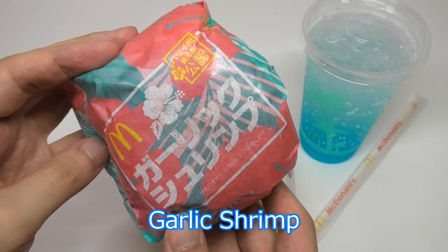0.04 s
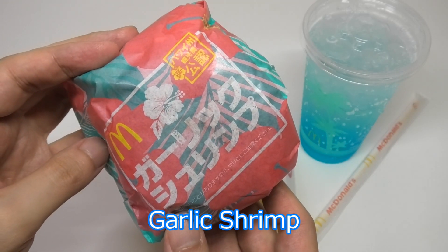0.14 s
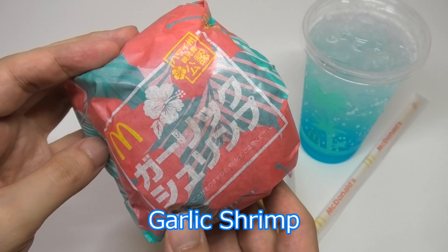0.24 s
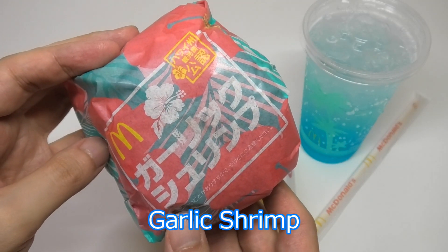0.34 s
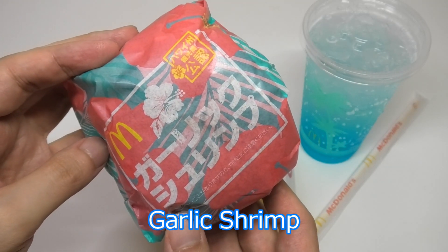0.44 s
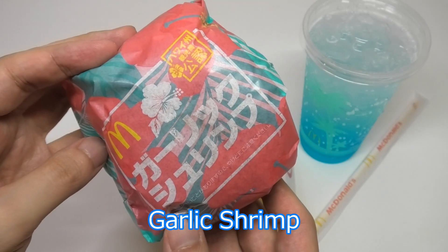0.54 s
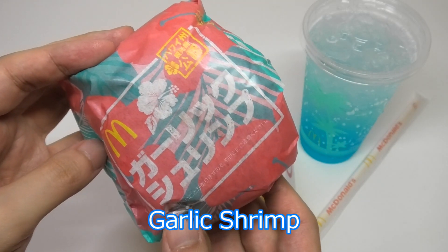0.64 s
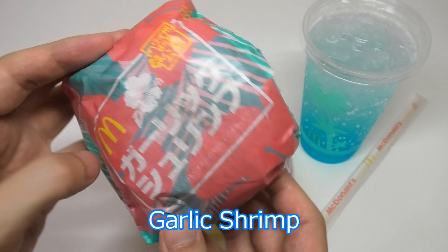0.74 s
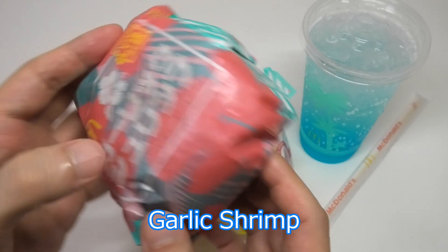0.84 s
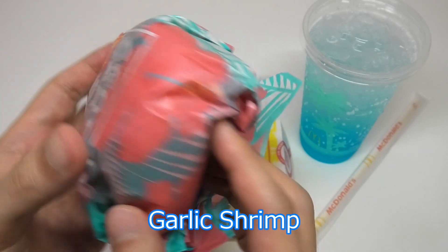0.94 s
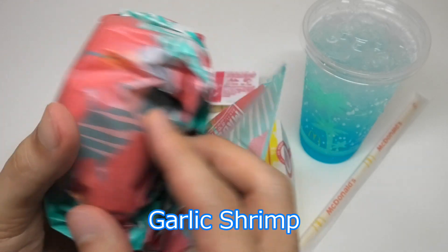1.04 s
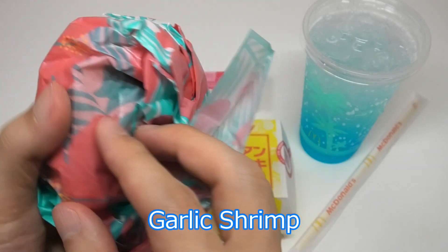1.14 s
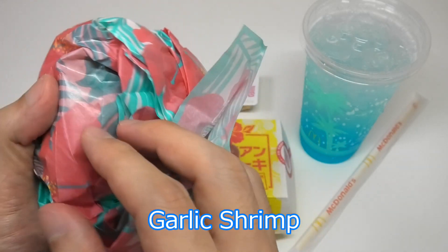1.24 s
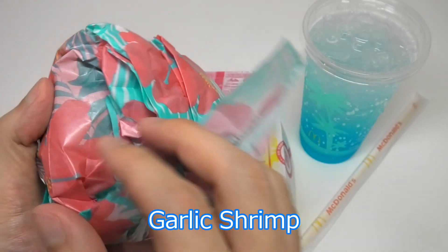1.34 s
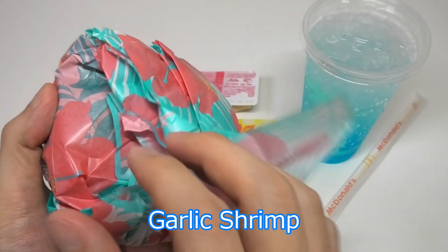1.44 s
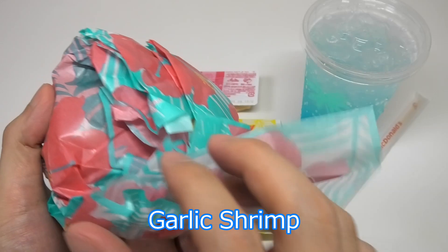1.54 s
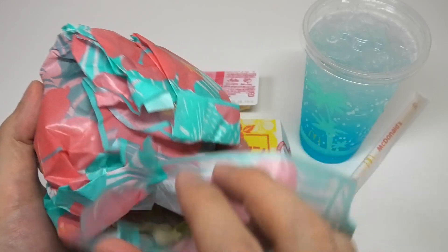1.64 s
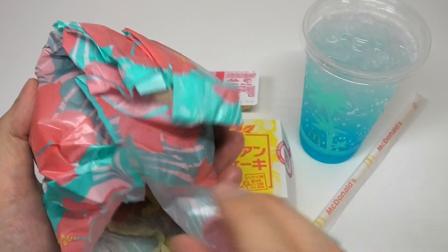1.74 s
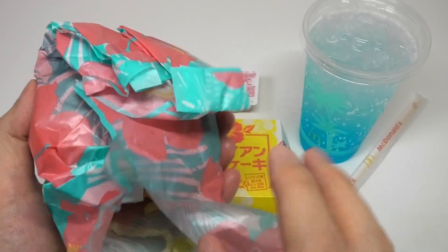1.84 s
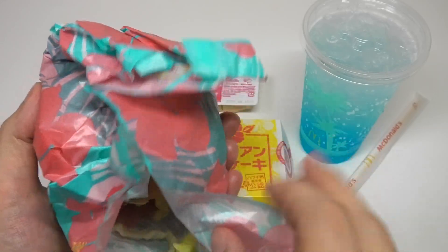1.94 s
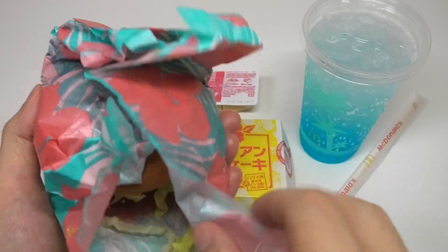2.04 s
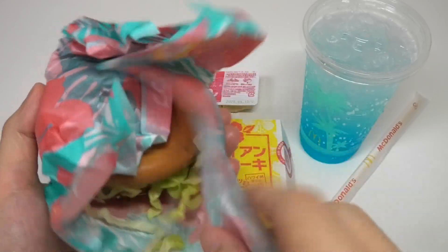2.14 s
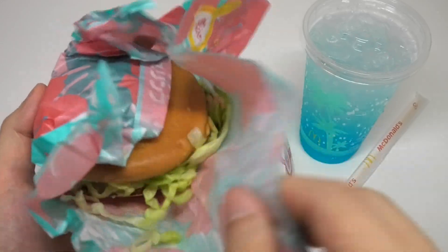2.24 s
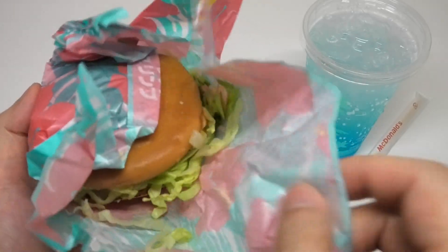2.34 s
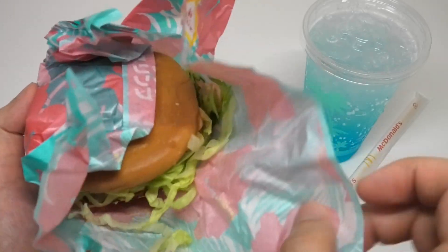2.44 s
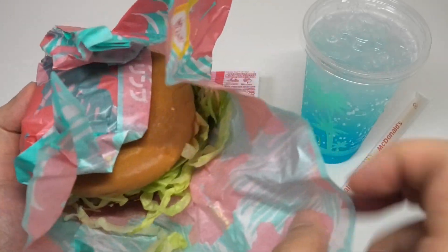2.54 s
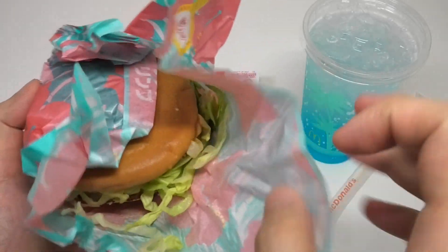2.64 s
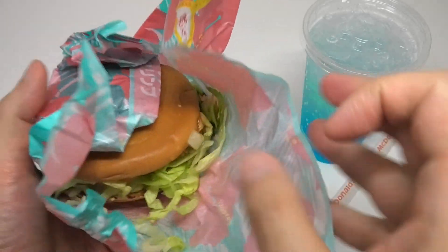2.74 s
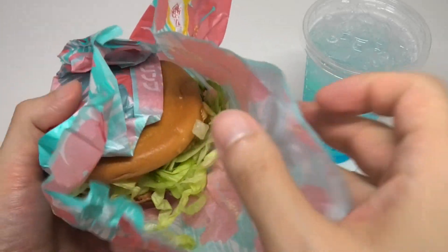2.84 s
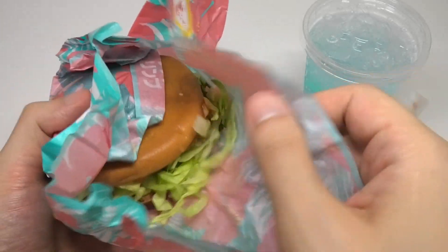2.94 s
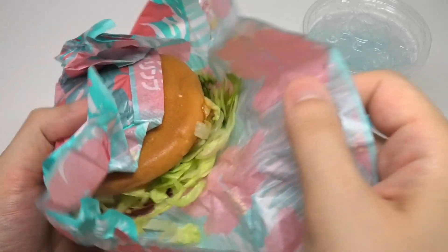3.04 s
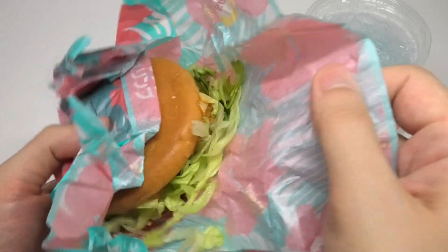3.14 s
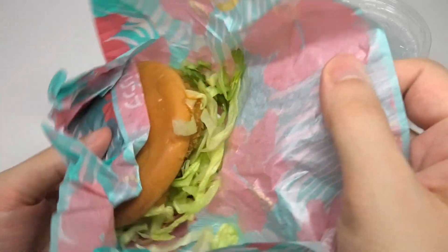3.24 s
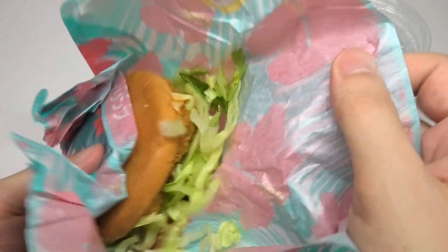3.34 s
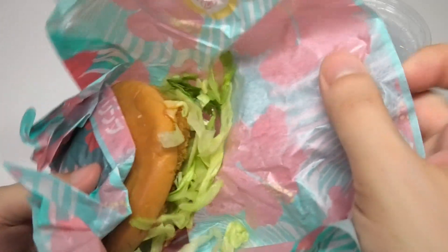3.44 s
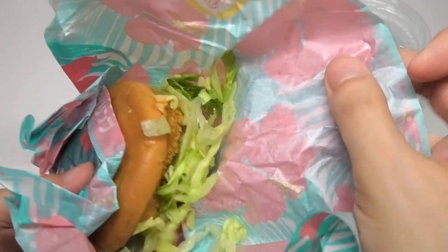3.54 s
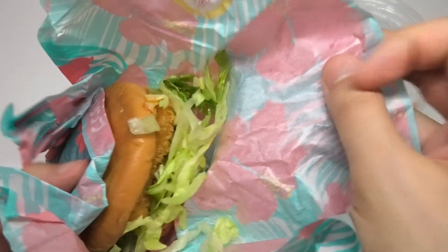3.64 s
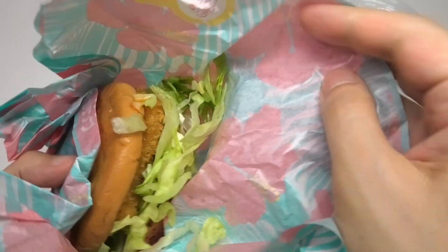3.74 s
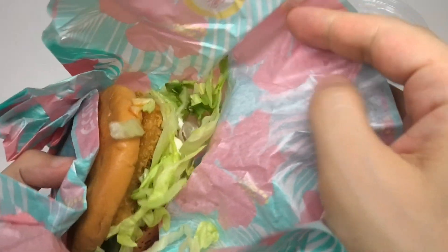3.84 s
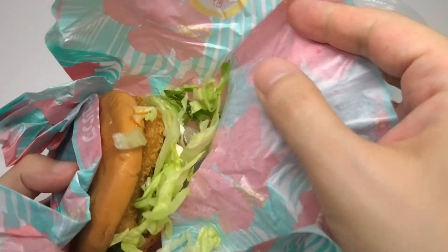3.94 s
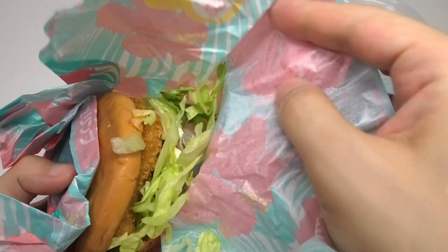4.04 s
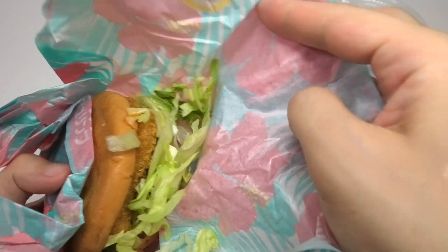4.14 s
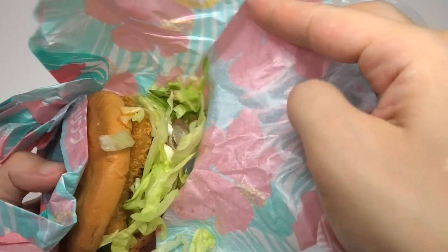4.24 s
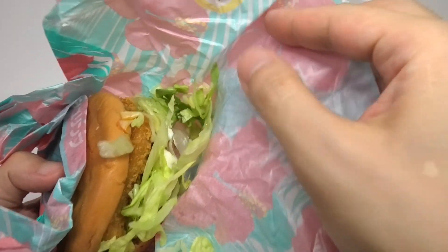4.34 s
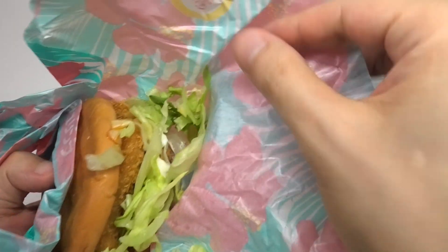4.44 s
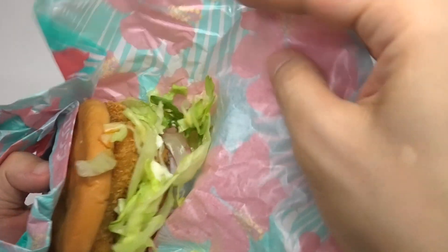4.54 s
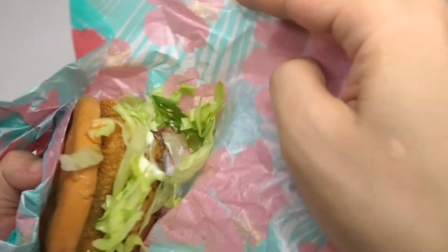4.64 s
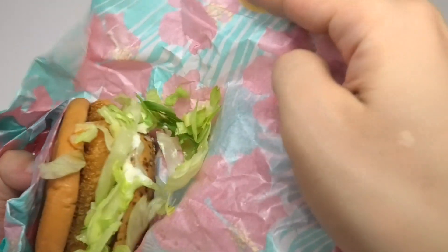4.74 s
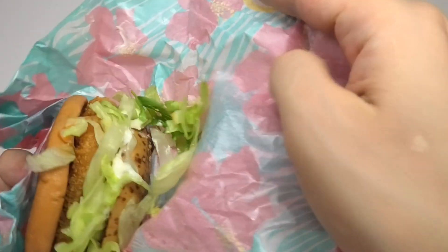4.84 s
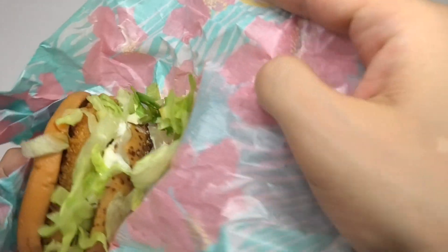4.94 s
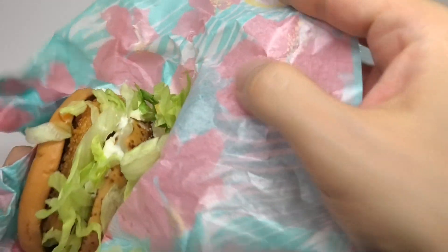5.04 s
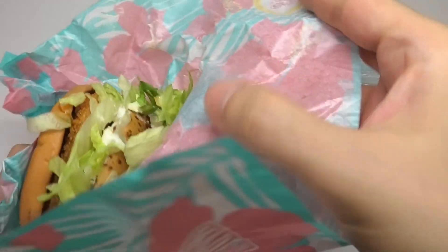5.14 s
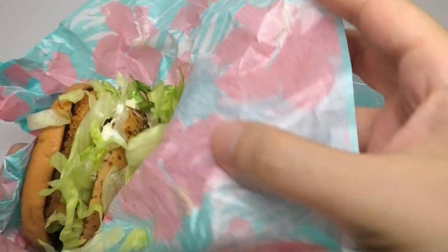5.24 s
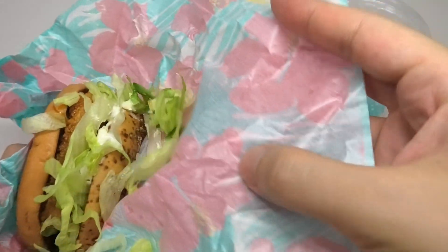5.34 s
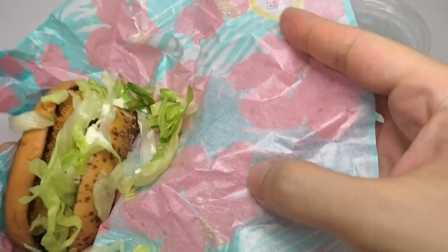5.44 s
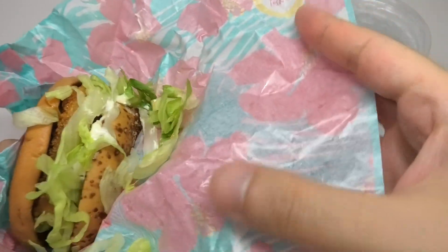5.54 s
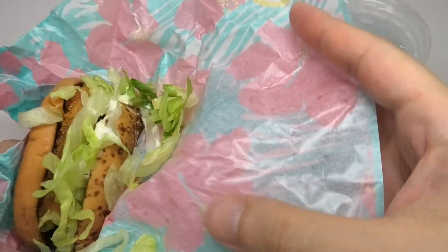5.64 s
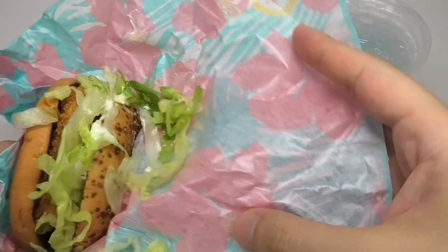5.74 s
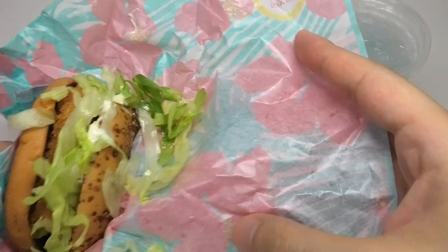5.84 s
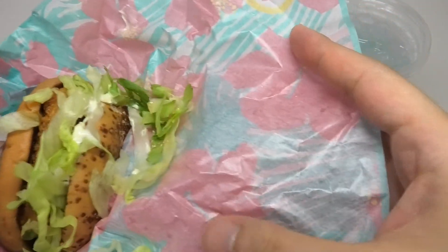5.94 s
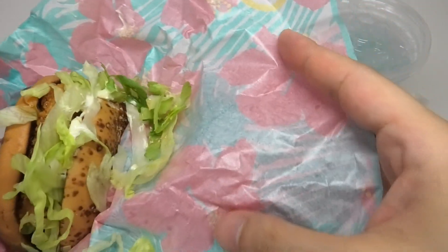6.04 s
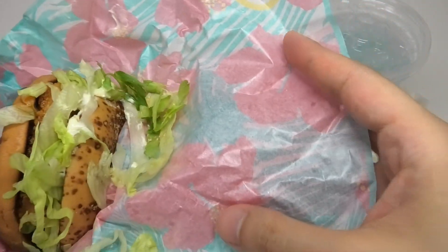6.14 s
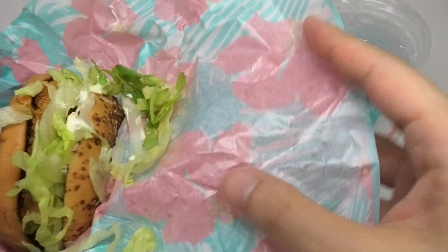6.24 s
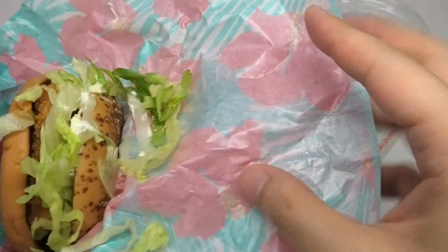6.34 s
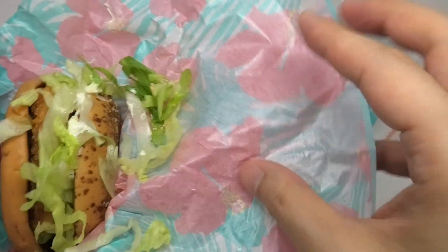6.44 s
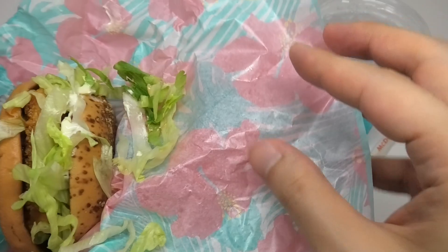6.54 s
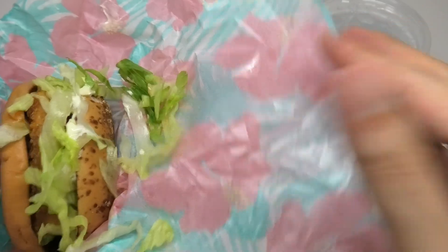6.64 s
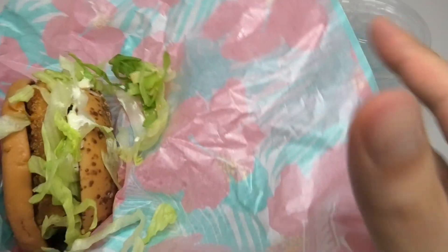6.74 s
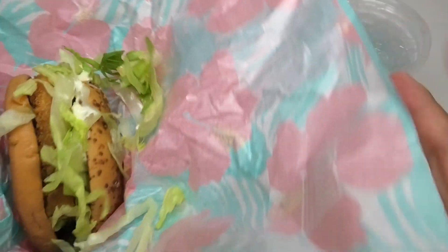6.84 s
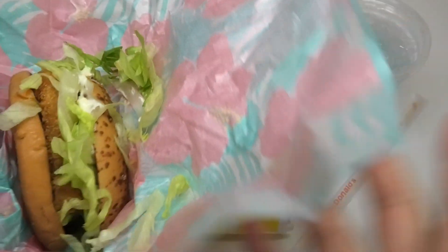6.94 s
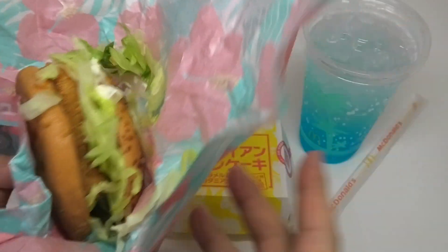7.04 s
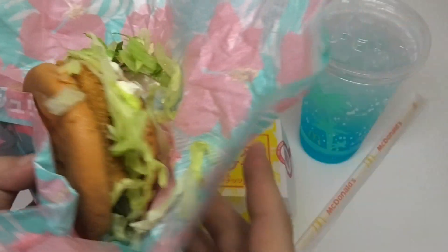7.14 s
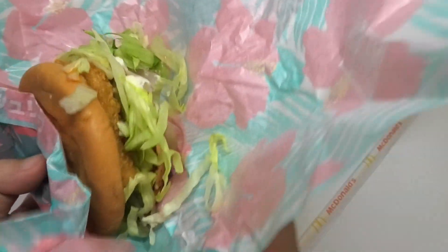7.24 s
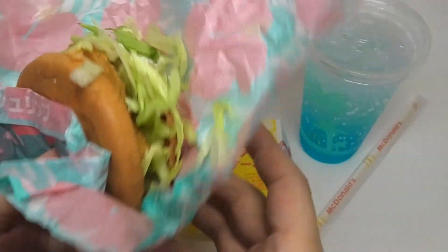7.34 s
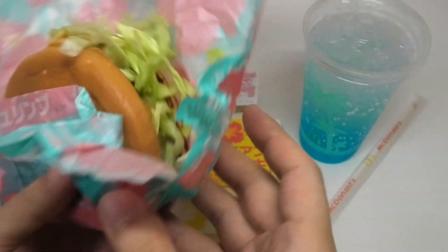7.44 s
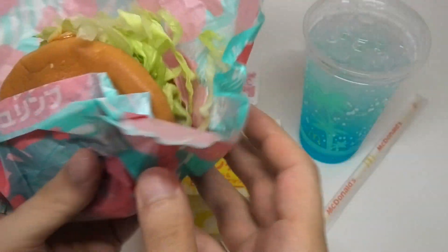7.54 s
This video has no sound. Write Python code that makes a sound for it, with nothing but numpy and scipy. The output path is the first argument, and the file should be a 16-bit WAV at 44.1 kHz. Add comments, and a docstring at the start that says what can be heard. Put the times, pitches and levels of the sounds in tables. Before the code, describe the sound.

A few light snaps, then continuous crisp crackling and rustling as a paper burger wrapper is unfolded by hand.

```python
"""A few light snaps, then a crisp crackle: hands unfold the thin waxed paper around a burger, close by.
With each pull swarms of tiny facets buckle, each releasing its elastic energy as a click, and the
layers slide on each other with a hiss of friction. Creases snap over one by one, and now and then a
wide panel pops through with a hollow knock. The small, quiet room adds a short reverberation."""
import sys
import numpy as np
from scipy import signal
from scipy.fft import rfft, irfft, next_fast_len
from scipy.io import wavfile
from scipy.ndimage import map_coordinates

SR = 44100
rng = np.random.default_rng(int(sys.argv[2]) if len(sys.argv) > 2 else 0)


def output_pcm(signal):
    """Save a mono or channel-first signal as 16-bit PCM at the path in sys.argv[1].

    Samples are clipped to [-1, 1] before scaling.
    """
    pcm = np.clip(np.atleast_2d(signal).T, -1, 1) * 32767
    wavfile.write(sys.argv[1], SR, np.round(pcm).astype(np.int16))


N = 335160

# the tugs that open the sheet: (start [s], length [s], effort [dB], facet pitch [Hz])
PULLS = [(0.742, .015, -44, 2630), (0.86, .19, -39.5, 3670), (1.09, .15, -37, 2500), (1.45, .03, -41, 2580),
         (1.65, .12, -35.5, 3040), (1.79, .23, -36.5, 2930), (2.108, .065, -33.5, 4230),
         (2.205, .08, -32.5, 3500), (2.34, .11, -36, 2650), (2.6, .07, -39, 4000), (2.78, .16, -41.5, 2580),
         (2.97, .07, -33.5, 2690), (3.06, .07, -30.5, 2800), (3.15, .11, -35, 2950),
         (3.35, .15, -34.5, 2660), (3.54, .06, -38, 2100), (3.65, .16, -35.5, 2600), (3.87, .09, -32, 3300),
         (4.03, .04, -31.5, 3500), (4.16, .07, -33.5, 2700), (4.305, .045, -33.5, 4380),
         (4.517, .05, -28.5, 2850), (4.63, .075, -31.5, 3130), (4.72, .11, -35, 2760),
         (5.0, .15, -37, 3230), (5.345, .05, -34.5, 3150), (5.44, .1, -35, 2950), (5.73, .06, -35.5, 3230),
         (5.885, .035, -42, 2800), (6.02, .05, -40, 2520), (6.24, .04, -44, 2640), (6.375, .08, -36, 3060),
         (6.51, .04, -43, 2400), (6.68, .09, -43, 2700), (6.89, .07, -41, 3030), (7.02, .06, -43.5, 3300),
         (7.16, .07, -41.5, 3560), (7.395, .2, -38.5, 4080)]
# sliding of layer on layer, relative to the effort: (time [s], level [dB])
SLIP = [(0.65, -3.5), (0.9, -3.5), (1.35, -3.5), (1.6, -2.5), (2.2, -3), (2.7, -1.5), (3.1, -5), (6.1, -3),
        (6.8, -4.5), (7.2, -7)]


def crinkle(level_db=-1.5, rate=540, size_db=7.5, clump_db=3.5, pitch_spread=0.99, relief=0.43):
    """Elastic buckling: tiny facets give way in clumps; harder bending trips more of them, and louder."""
    touch_s, share_s, lowest_hz = 0.55, 0.052, 720
    t = np.arange(N) / SR
    flex = amp(effort_db(t))
    density = flex ** .8 * (t > touch_s)
    chance = rng.random(int(rate * N / SR))
    s = np.interp(chance, np.cumsum(density) / density.sum(), t)
    size, pitch = rng.standard_normal((2, len(s)))
    at = (s * SR).astype(int)
    gains = amp(size_db * np.minimum(size, 1.8) + clump_db * wobble(80)[at])
    # the facets of one moment share the energy that the hands put in
    window = np.hanning(int(share_s * SR) * 2) / (share_s * SR)
    spent = signal.oaconvolve(np.bincount(at, gains ** 2, N), window, "same")
    gains *= amp(level_db) * flex[at] / np.sqrt(abs(spent[at]))
    # sliding layers relieve the strain, so the facets buckle more softly
    slip_db = curve(SLIP, s)
    gains *= amp(-relief * (slip_db - slip_db.mean()))
    hz = lowest_hz + abs(facet_hz(s) - lowest_hz) * np.exp(pitch_spread * pitch)
    return buckles(s, gains, np.minimum(hz, 14000), ring_db=5, ring_t60=.016, q=.9, mode_db=9.5)


def creases(level_db=-1, run_db=-9, run_s=.0006, follow_db=-15, follow_s=.005, count=2):
    """Snap-through instability: a crease flips in a few jerks, then trips smaller neighbours."""
    # the creases that stand out: (time [s], relative energy [dB], pitch [Hz])
    main_creases = [(0.6257, -22.5, 3140), (0.7345, -12, 2390), (0.7434, -17, 1207), (0.765, -18.5, 3600),
                    (0.832, -16, 3520), (0.916, -22, 5500), (1.1195, -7, 1670), (1.1391, -18, 12000),
                    (1.39, -15, 3000), (1.4588, -16, 3680), (1.5207, -7.5, 4040), (1.5649, -8.5, 2960),
                    (1.7386, -6, 6900), (1.7971, -5.5, 2050), (1.837, -3.5, 3700), (1.9178, -7.5, 4870),
                    (2.074, -8.5, 4300), (2.2099, -4, 5800), (2.2568, -9, 2540), (2.4193, -2.5, 3680),
                    (2.4766, -1.5, 6400), (2.5466, -12, 1430), (2.5697, -5, 5170), (2.6392, -6.5, 2100),
                    (2.6761, -7.5, 4560), (2.7284, -10, 4700), (2.7756, -9, 2470), (2.9687, -4.5, 3230),
                    (3.1084, -3.5, 2080), (3.1444, 4, 3880), (3.2064, -17, 2400), (3.2318, -5, 4530),
                    (3.3538, -8, 2400), (3.4416, -1.5, 3600), (3.4905, -2.5, 3200), (3.6623, -21, 5100),
                    (3.7414, -2, 4070), (3.7919, -1, 2540), (3.8322, -3.5, 4020), (3.9433, -0.5, 3960),
                    (4.0254, -4, 3900), (4.0561, 2, 3500), (4.1891, 0, 9700), (4.2676, -4.5, 2780),
                    (4.3513, -8, 6700), (4.4475, 0.5, 4900), (4.482, -10.5, 7850), (4.5184, 1.5, 4400),
                    (4.5435, -1.5, 4900), (4.6375, 0, 3720), (4.6884, -0.5, 2800), (4.7922, -2, 5460),
                    (4.8449, -4, 4200), (4.8631, -11, 6300), (4.9535, -9.5, 3340), (4.9839, -3.5, 3500),
                    (5.0013, -4.5, 4270), (5.045, -2, 2620), (5.3445, -1.5, 2360), (5.3588, 0, 4030),
                    (5.3646, -2.5, 3320), (5.3728, -3, 2820), (5.44, -2.5, 2100), (5.4995, -1.5, 5500),
                    (5.7105, -5.5, 4380), (5.7262, 2, 6600), (5.7379, 1.5, 5470), (5.7826, -5.5, 5900),
                    (5.846, -16, 2030), (5.879, -5.5, 4000), (6.0197, -7.5, 3470), (6.0268, -7.5, 4400),
                    (6.0424, -6, 5000), (6.076, -22, 5960), (6.1604, -12, 2230), (6.2398, -13, 3240),
                    (6.3429, -3.5, 2780), (6.3803, -5, 4900), (6.4213, -2, 3000), (6.5194, -11, 1530),
                    (6.7041, -10.5, 980), (6.816, -14, 1430), (6.904, -12, 5500), (7.009, -19, 3000),
                    (7.049, -17.5, 6000), (7.1582, -9.5, 1590), (7.1781, -15, 3520), (7.2218, -8, 7440),
                    (7.307, -13, 2250), (7.3553, -13, 4500), (7.4228, -12, 1900), (7.4516, -7, 2290),
                    (7.538, -4, 5340)]
    s, db, hz = np.vstack([main_creases, lesser_creases()]).T
    snap = buckles(s, amp(db + level_db), hz, ring_db=2.5, ring_t60=.013, q=.85, mode_db=-3)
    jerk, wait, size, pitch = rng.standard_normal((len(s) * count, 4)).T
    s, db, hz = np.repeat([s, db, hz], count, axis=1)
    run = buckles(s + run_s * jerk, amp(db + run_db), hz * np.exp(.3 * pitch),
                  ring_db=-1.5, ring_t60=.014, q=.48, mode_db=-3)
    neighbours = buckles(s + follow_s * abs(wait), amp(db + follow_db + 4.7 * size),
                         hz * np.exp(-.5 * abs(pitch)), ring_db=0, ring_t60=.012, q=.93, mode_db=5)
    return snap + run + neighbours


def lesser_creases(rate=8, above_db=24, range_db=6, pitch_hz=3600, pitch_range=1.27):
    """Small creases yield at random under load: (time [s], relative energy [dB], pitch [Hz])."""
    moment, size, pitch = rng.random((int(rate * N / SR), 3)).T
    progress = (np.arange(len(moment)) + moment) / len(moment)
    s = np.interp(progress, [0, 1], [PULLS[0][0], N / SR])
    db = effort_db(s) + above_db + range_db * (size - .5)
    hz = pitch_hz * np.exp(pitch_range * (pitch - .5))
    return np.transpose([s, db, hz])


def ticks(above_db=15, rate=26, size_db=5, pitch_hz=9500):
    """Random impulses: sharp corners of the folds flick, thin and bright, even under a light hand."""
    moment, size, pitch = rng.random((int(rate * N / SR), 3)).T
    s = np.interp(moment, [0, 1], [PULLS[0][0], N / SR])
    db = effort_db(s) + above_db + size_db * np.minimum(-np.log(size), 2)
    return buckles(s, amp(db), pitch_hz * np.exp(pitch - .5), ring_db=-5, ring_t60=.0087, q=1, mode_db=2)


def buckles(times, gains, pitch_hz, ring_db, ring_t60, q, mode_db, mode_q=15, mode_spread=0.3125):
    """Impulse excitation: each buckle is a sharp push and a short shiver through a facet's resonances."""
    size, lead_in = 512, 8  # samples
    lag_spread_s, pan_db = 14e-6, 2
    t, hz = np.arange(size) / SR, np.fft.rfftfreq(size, 1 / SR) + 1
    draws = rng.standard_normal((len(times), size + 4))
    sign, place, pan, shape = draws[:, :4].T[:, :, None]
    shiver = draws[:, 4:] * amp(-60 * t / ring_t60)
    push = amp(ring_db) * shiver / np.linalg.norm(shiver, axis=1, keepdims=True)
    push[:, :1] = np.sign(sign)
    # a broad hump set by the facet's size, and one narrow mode set by its shape
    ratio = hz / pitch_hz[:, None]
    facet = resonance(ratio, q) + amp(mode_db) * resonance(ratio * np.exp(mode_spread * shape), mode_q)
    spectra = rfft(np.roll(push, lead_in, axis=1)) * facet
    spectra *= gains[:, None] / np.sqrt(np.mean(abs(spectra) ** 2, axis=1, keepdims=True))
    # every spot on the sheet reaches the two microphone ports with its own delay and balance
    port = amp(pan_db * pan / 2) * np.exp(1j * np.pi * hz * lag_spread_s * place)
    where = ((times * SR).astype(int)[:, None] + np.arange(size) - lead_in).ravel()
    return np.array([np.bincount(where, irfft(spectra * p).ravel(), N)[:N] for p in (port, 1 / port)])


def radiate(x, size=1024):
    """Radiation from the sheet as a minimum-phase filter, which keeps the attacks sharp."""
    # what the sheet radiates: (frequency [Hz], gain [dB])
    radiation = [(60, -31), (200, -21.5), (400, -1.5), (720, 0), (1400, -0.5), (1900, -4.5), (3200, -1),
                 (5500, -1), (7900, 1.5), (10300, -4), (13800, -14.5), (15500, -8.5)]
    cepstrum = irfft(np.log(amp(along(radiation, np.fft.rfftfreq(size, 1 / SR)))))
    cepstrum[1:size // 2] *= 2
    cepstrum[size // 2 + 1:] = 0
    impulse_response = irfft(np.exp(rfft(cepstrum)))
    return signal.oaconvolve(x, impulse_response[None], axes=1)[:, :N]


def panels(level_db=-1.5, upper_gain=0.44, t60=.04, rise_s=.0015):
    """Damped modal vibration: a wide panel flips over and knocks in a few low modes."""
    # panels popping through: (time [s], relative level [dB], lowest mode [Hz])
    pops = [(0.734, -45, 450), (1.793, -26.5, 790), (2.42, -32, 584), (2.966, -29, 823), (3.11, -24.5, 752),
            (3.689, -29, 834), (4.182, -29.5, 670), (5.437, -38, 523), (6.34, -38, 930), (6.518, -48, 1040),
            (6.702, -33, 946), (6.944, -36, 870), (7.177, -39, 732), (7.423, -29.5, 682), (7.452, -30, 687)]
    out, t = np.zeros(N + SR), np.arange(SR // 10) / SR
    envelope = amp(-60 * t / t60) * (1 - np.exp(-t / rise_s))
    for s, db, hz in pops:
        upper_hz = hz * np.exp(.5 * abs(rng.standard_normal((4, 1))))
        ring = np.sin(2 * np.pi * hz * t) + upper_gain * np.sin(2 * np.pi * upper_hz * t).sum(0)
        out[round(s * SR):][:len(t)] += ring * envelope * amp(db + level_db)
    # dipole cancellation: long waves from the front and the back of the sheet cancel
    return signal.lfilter(*signal.butter(3, 500, "high", fs=SR), out[:N])


def slide(catch_db=4, apart=0.29, split_hz=2500, tilt=0.26):
    """Friction noise: layers and fingertips rub and catch, brighter where the paper is taut."""
    # paper sliding on paper: (frequency [Hz], relative spectral density [dB])
    friction = [(60, -27), (180, -30.5), (300, -16.5), (650, 0), (1500, -1), (4500, 1), (8000, -4),
                (11500, -11), (16000, -10)]
    t = np.arange(N) / SR
    mid, side = rng.standard_normal((2, N))
    noise = np.array([mid + apart * side, mid - apart * side])
    hiss = filtered(noise, lambda hz: amp(along(friction, hz)))
    dull = filtered(hiss, lambda hz: 1 / (1 + (hz / split_hz) ** 2))
    taut = (facet_hz(t) / split_hz) ** tilt
    rub = (dull / taut + (hiss - dull) * taut) * amp(catch_db * wobble(260))
    return unit(rub) * amp(effort_db(t) + curve(SLIP, t))


def sway(centre_hz=330, q=0.95, apart=0.91, flutter_db=4):
    """Air displacement: the bending sheet fans a faint low flutter."""
    # low body of the sheet, relative to the effort: (time [s], level [dB])
    body = [(1.1, -33), (1.6, -41), (2.25, -26), (2.7, -30), (3.2, -31), (4.2, -36), (5.4, -23), (6.4, -30),
            (7.4, -35)]
    t = np.arange(N) / SR
    draught = rng.standard_normal(N) + apart * rng.standard_normal((2, N))
    flutter = filtered(draught, lambda hz: resonance((hz + 1) / centre_hz, q) ** 2)
    return unit(flutter * amp(flutter_db * wobble(60))) * amp(effort_db(t) + curve(body, t))


def pull_powers(s, attack_db_per_s=701, sag_db_per_s=12, release_db_per_s=260):
    """Driving power, a row for the grip and each pull: a pull takes hold, eases and dies away."""
    # steady strain of the holding hand: (time [s], effort [dB])
    grip = [(0.55, -85), (0.63, -59), (0.72, -59), (0.82, -46), (1.4, -45), (2.05, -47), (2.72, -47),
            (3.2, -44), (3.85, -40), (4.45, -45), (4.88, -42), (5.23, -48), (5.42, -41), (5.63, -54),
            (5.98, -56), (6.33, -47.5), (7.13, -50), (7.6, -46)]
    start, length, db, _ = np.transpose(PULLS)[:, :, None]
    age = s - start
    fall_db = (attack_db_per_s * np.maximum(-age, 0)
               + sag_db_per_s * np.clip(age, 0, length)  # the paper gives
               + release_db_per_s * np.maximum(age - length, 0))  # the fingers stop
    return amp(np.vstack([curve(grip, s), np.maximum(db - fall_db, -150)])) ** 2


def effort_db(s, size=4096):
    """Addition of powers: grip and pulls sum to how hard the sheet is worked."""
    grid = np.linspace(0, N / SR, size)
    return np.interp(s, grid, 10 * np.log10(pull_powers(grid).sum(0)))


def facet_hz(s, slack_hz=2454, size=4096):
    """Power-weighted mean pitch of the facets under grip and pulls, higher where small and taut."""
    grid = np.linspace(0, N / SR, size)
    power, hz = pull_powers(grid), np.append(slack_hz, np.transpose(PULLS)[3])
    return np.interp(s, grid, hz @ power / power.sum(0))


def room(x, gap_s=.004, block=16384):
    """Reverberation from table and walls, with a new response for each block as the sheet moves."""
    # room decay: (frequency [Hz], reverberation time [s])
    decay = [(200, 0.16), (2000, 0.1), (12000, 0.044)]
    out = np.zeros((2, N + SR))
    for start in range(0, N, block):
        hz, t, spectra = signal.stft(rng.standard_normal((2, SR // 3)), SR, nperseg=256)
        mid, side = signal.istft(spectra * amp(-60 * t / along(decay, hz)[:, None]), SR, nperseg=256)[1]
        # the close ports hear the same long waves; their echoes differ most in the middle range
        side = signal.lfilter(*signal.butter(1, [1200, 9000], "band", fs=SR), side)
        tail = np.array([mid + side, mid - side])
        wet = signal.fftconvolve(x[:, start:start + block], tail / np.linalg.norm(tail[0]), axes=1)
        out[:, start + int(gap_s * SR):][:, :wet.shape[1]] += wet
    return out[:, :N]


def air(level_db=-68.5, drone_db=-79.5, drone_hz=538, drone_q=8):
    """Ambient noise floor with one soft, humming resonance."""
    # still room air: (frequency [Hz], relative spectral density [dB])
    ambient = [(20, -9), (75, -7.5), (200, -5.5), (280, 1), (420, -3), (600, 0.5), (1500, -7),
               (4000, -13.5), (15000, -21.5)]
    noise = rng.standard_normal((2, N)) + .5 * rng.standard_normal(N)
    hush = filtered(noise, lambda hz: amp(along(ambient, hz)))
    drone = filtered(rng.standard_normal(N), lambda hz: resonance((hz + 1) / drone_hz, drone_q) ** 2)
    return amp(level_db) * unit(hush) + amp(drone_db) * unit(drone)


def resonance(ratio, q):
    """Band-pass response of a damped oscillator, against frequency over natural frequency."""
    return 1 / (1 + 1j * q * (ratio - 1 / ratio))


def filtered(x, response):
    """Linear filtering: the spectrum of x times a frequency response."""
    size = next_fast_len(N + SR // 2)
    return irfft(rfft(x, size) * response(np.fft.rfftfreq(size, 1 / SR)), size)[..., :N]


def wobble(rate):
    """Smooth random modulation, rate knots a second."""
    knots = rng.standard_normal(int(N * rate / SR) + 4)
    return map_coordinates(knots, [np.arange(N) * rate / SR], order=2)


def along(points, hz):
    """Interpolation of (frequency [Hz], value) points on a log axis."""
    frequencies, values = np.transpose(points)
    return np.interp(np.log(hz + 1), np.log(frequencies), values)


def curve(rows, s):
    """Linear interpolation of (time [s], value) rows."""
    return np.interp(s, *np.transpose(rows))


def amp(db):
    """Decibels to amplitude ratio."""
    return 10 ** (np.asarray(db) / 20)


def unit(x):
    """Normalisation to rms 1."""
    return x / np.sqrt(np.mean(x ** 2) + 1e-20)


def scene():
    """Superposition of the wrapper, slightly to the right, its reverberation and the room air."""
    paper = radiate(creases() + crinkle() + ticks()) + panels() + slide() + sway()
    paper = paper * amp([[-.3], [.3]])
    return paper + amp(-18) * room(paper) + air()


def record(dry, lead_s=.000037, housing_q=13, top_hz=15750):
    """Microphone response: the left port hears earlier, the housing resonates, the band is limited."""
    # narrow resonances and notches of the housing: (frequency [Hz], added gain [ratio])
    housing = [(1030, -0.24), (2170, 0.4), (3270, 0.16), (4200, -0.27), (4550, 0.18)]
    ports = filtered(dry, lambda hz: np.exp(1j * np.pi * np.outer([1, -1], hz) * lead_s))
    housed = filtered(ports, lambda hz: 1 + sum(gain * resonance((hz + 1) / centre, housing_q)
                                                for centre, gain in housing))
    return filtered(housed, lambda hz: np.clip((top_hz - hz) / 300 + .5, 0, 1))


dry = scene()
out = record(dry)
output_pcm(out)
```